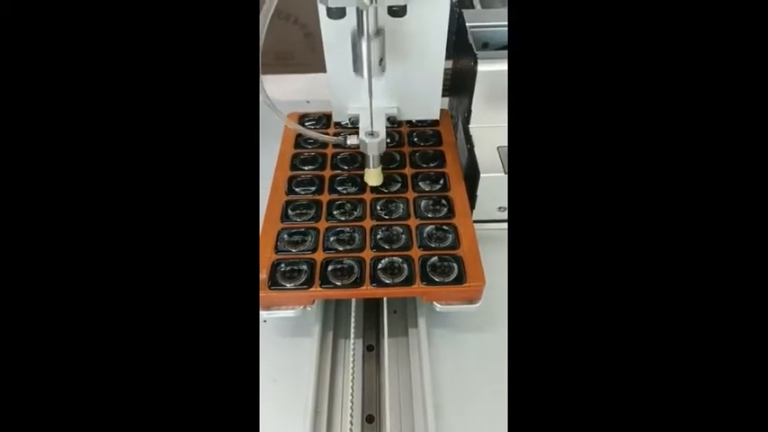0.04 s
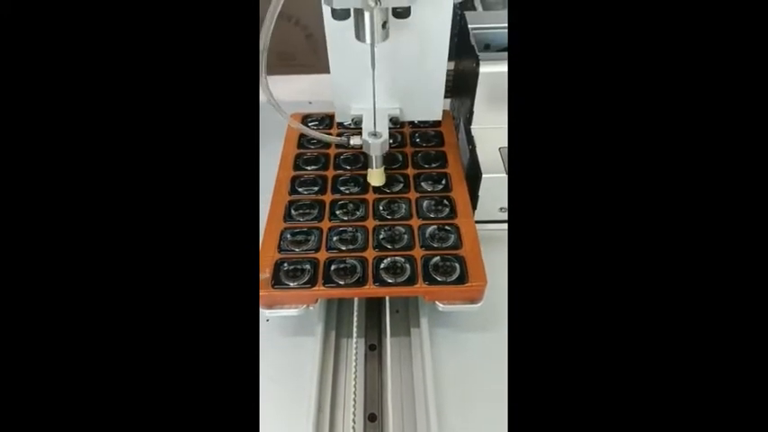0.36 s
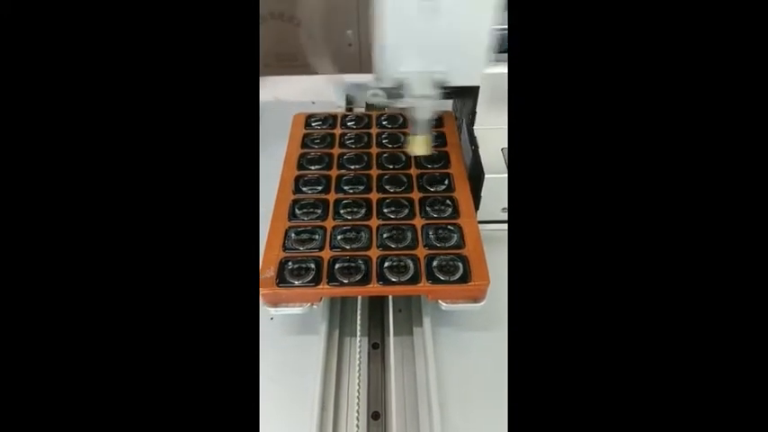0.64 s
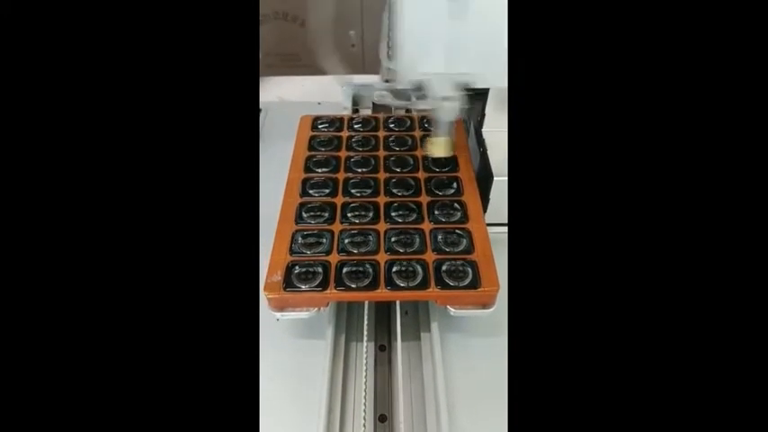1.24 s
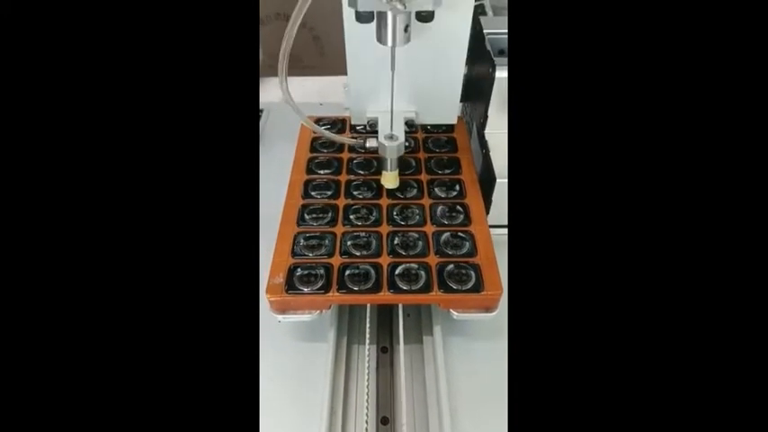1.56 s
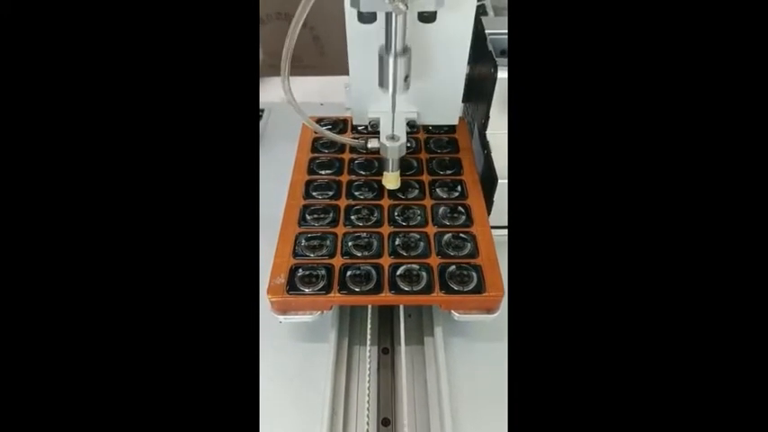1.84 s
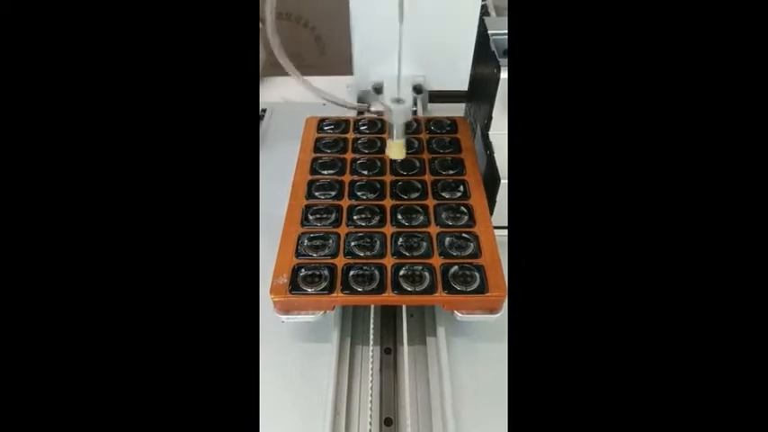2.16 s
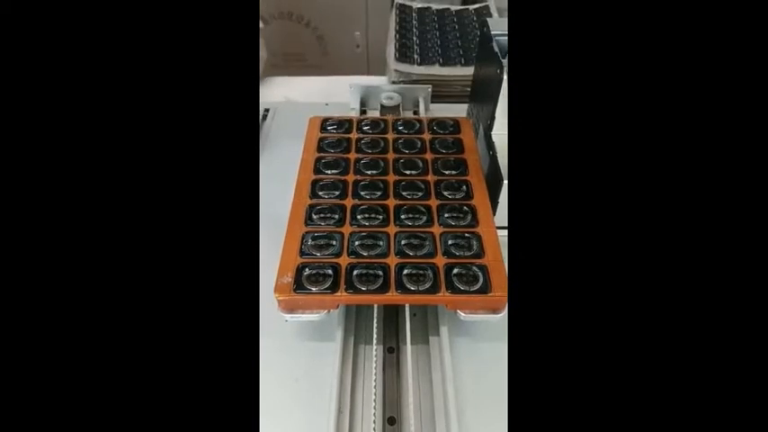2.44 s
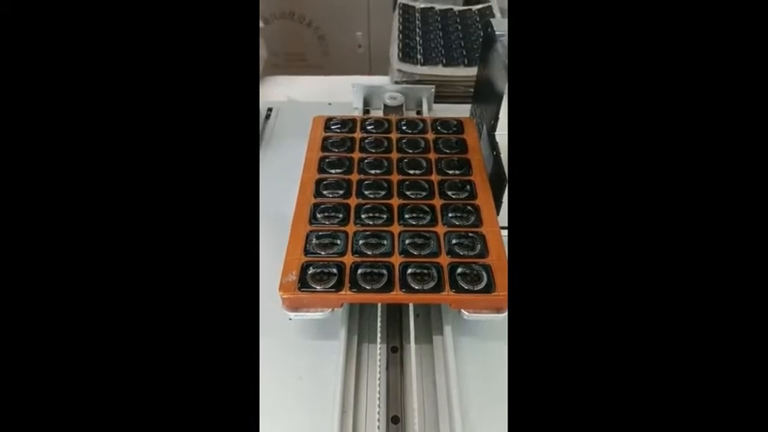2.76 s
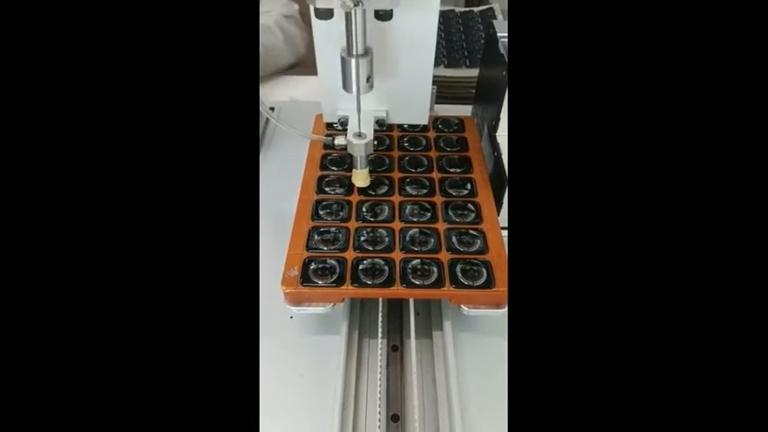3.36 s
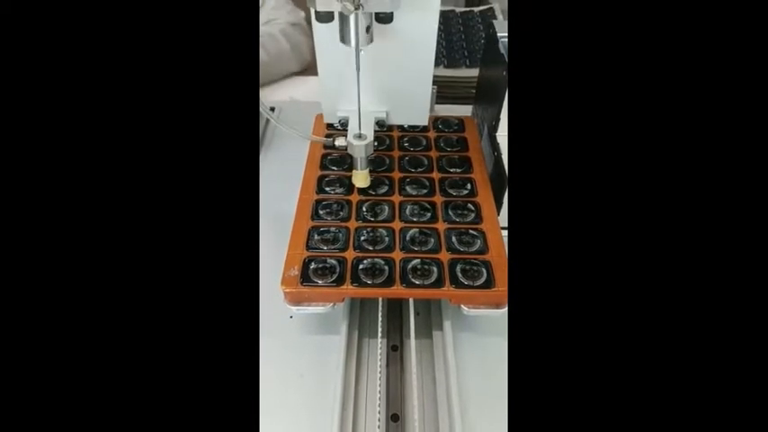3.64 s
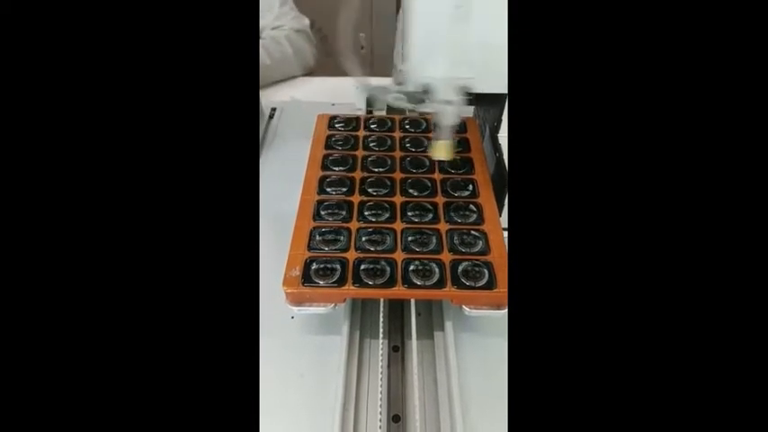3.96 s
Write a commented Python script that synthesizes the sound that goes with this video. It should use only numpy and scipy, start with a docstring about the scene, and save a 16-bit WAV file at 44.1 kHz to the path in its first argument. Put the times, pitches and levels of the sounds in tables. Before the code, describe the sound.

A pick-and-place machine runs close by over a fluttering pump hum and workshop fan noise. Its air cylinder hisses down and up, knocking at each end with a low rumble, at 0 to 0.3 seconds, 1.5 to 1.9 and 3.2 to 3.6. The head rushes and rattles along rails with motor growl and thin metallic ringing around 0.6, 1.3, 2.2 and 2.9 seconds, starting again near 3.8.

```python
"""A noisy workshop, with a pick-and-place machine working close by.
A vacuum pump hums and its air flutters. The head rolls and rattles along its rails, its motor
growls, and jolts set a metal part ringing. An air cylinder hisses as it drives the nozzle down
and up, and knocks at both ends; the level dips briefly after most knocks."""
import sys
import numpy as np
from scipy import signal
from scipy.fft import rfft, irfft
from scipy.io import wavfile

SR = 44100
rng = np.random.default_rng(int(sys.argv[2]) if len(sys.argv) > 2 else 0)


def persist_wave(psi):
    """Save psi, clipped to +-1, as 16-bit WAV."""
    counts = np.round(np.clip(psi, -1, 1) * 32767).astype(np.int16)
    wavfile.write(sys.argv[1], SR, np.atleast_2d(counts).T)


N = 176400
TIME = np.arange(N) / SR
CUTOFF_HZ, RUN_RAMP_S = 7520, 0.029
# knocks of cylinder and carriage
# (time [s], thud [dB], clack [dB], tick [dB], relative dip after it [dB]; a negative dip lifts)
KNOCK_CUES = [(.122,-16.5,-22,-24.5,-0.5),(0.1436,-12,-13,-21,2),(.317,-33,-12,-13.5,2),(.413,-18,-37,-16,6),(.551,-28,-21.5,-23.5,1),(0.924,-11,-24,-37.5,-0.5),(1.499,-38,-20.5,-26,8.5),(1.710,-19,-20,-26,3.5),(1.7311,-6,-10,-23.5,-5.5),(1.758,-22,-26,-29,7),(1.929,-27,-12.5,-20.5,3),(2.014,-16.5,-37,-29,6.5),(2.148,-17,-17,-25,4),(2.518,-11,-21,-29.5,0),(3.162,-18.5,-20,-30,7),(3.391,-9.5,-11,-20,2),(3.571,-24,-10.5,-17,-0.5),(3.66,-22,-30,-17.5,6),(3.797,-19,-23.5,-26,3.5)]


def from_db(db):
    """Decibels to gain."""
    return 10 ** (np.asarray(db) / 20)


def rms_one(x):
    """Scale to unit power."""
    return x / np.sqrt(np.mean(x ** 2) + 1e-20)


def pan(db):
    """Left side up by db, right side down by as much."""
    return from_db([[db], [-db]])


def at_hz(points, hz):
    """Read a curve on a log-frequency axis."""
    points_hz, values = np.transpose(points)
    return np.interp(np.log(hz + 1e-3), np.log(points_hz), values)


def drift(rate_hz):
    """Smooth random wander of unit power."""
    hz = np.fft.rfftfreq(N, 1 / SR)
    return rms_one(irfft(rfft(rng.standard_normal(N)) / (1 + (hz / rate_hz) ** 2), N))


def gate(start, end, ramp):
    """Open from start to end, with sloping edges."""
    return np.clip(np.minimum(TIME - start, end - TIME) / ramp + .5, 0, 1)


def noise(spectrum, peaks=()):
    """Coloured stereo noise with resonances and the width of the room; its mid has unit power."""
    # stereo width of the room (frequency [Hz], side minus mid [dB])
    room_width = [(60,-9),(120,-27),(220,-15.5),(400,-10.5),(600,-1.5),(1000,-4),(1300,0.5),(1750,-3.5),(2050,3),(2300,-7.5),(2650,-1.5),(4000,-1),(5200,-1)]
    hz = np.fft.rfftfreq(N, 1 / SR)
    peaks_db = sum(height / (1 + (2 * (hz - centre) / width) ** 2) for centre, width, height in peaks)
    passband = (hz < CUTOFF_HZ + 500) / np.sqrt(1 + (spectrum[0][0] / 2 / (hz + 1)) ** 4)
    colour = from_db(at_hz(spectrum, hz) + peaks_db) * passband
    mid, side = rfft(rng.standard_normal((2, N))) * colour / np.sqrt(np.mean(colour ** 2))
    return irfft(mid, N) + irfft(side * from_db(at_hz(room_width, hz)), N) * np.array([[1], [-1]])


def bursts(spans, spectrum):
    """Fluttering noise that lasts as long as each movement."""
    envelope = sum(gate(start, end, ramp=0.0034) * from_db(db) for start, end, db in spans)
    return noise(spectrum) * envelope * from_db(2.1 * drift(30) - 1.5)


def rough_tone(hz, rough, width_hz, phase=0):
    """A tone that wavers at random in level and phase."""
    shake = 1 + rough * (drift(width_hz) + 1j * drift(width_hz))
    return np.real(shake * np.exp(2j * np.pi * hz * TIME + 1j * phase))


def ring(clicks, hz, t60):
    """Each click starts a decaying sine."""
    radius, angle = from_db(-60 / (t60 * SR)), 2 * np.pi * hz / SR
    feedback = [1, -2 * radius * np.cos(angle), radius * radius]
    return signal.lfilter([0, np.sin(angle)], feedback, clicks + 1e-18)


def struck(modes, times, levels_db, contacts):
    """Each blow and its quick bounces strike every mode with a strength of its own."""
    bounce_s, loss_db, spread_db = .0042, 3, 3.5
    bounce = np.arange(contacts)
    delays = bounce_s * bounce * rng.uniform(0.695, 1.5, (len(times), contacts))
    at = ((times[:, None] + delays) * SR).astype(int)
    out = np.zeros((2, N))
    for k, (hz, db, t60) in enumerate(modes):
        for side in range(2):
            scatter_db = spread_db * rng.standard_normal(at.shape)
            clicks = np.zeros(N)
            clicks[at] = from_db(levels_db[:, None] + db - loss_db * bounce + scatter_db)
            out[side] += (-1) ** k * ring(clicks, hz, t60)
    return out


def from_the_left(x):
    """The treble reaches the right side a little late; the bass arrives at both together."""
    treble_lag_s, bass_edge_hz = .00051, 720
    hz = np.fft.rfftfreq(N, 1 / SR)
    lag = treble_lag_s / (1 + (bass_edge_hz / (hz + 1)) ** 12)
    return np.array([x[0], irfft(rfft(x[1]) * np.exp(-2j * np.pi * hz * lag), N)])


def panels(x, count):
    """Reflections off nearby panels comb the treble; their paths change slowly."""
    near_s, far_s, sway_s, gain, low_cut_hz = .003, .012, .00012, 0.21, 804
    treble = signal.sosfilt(signal.butter(2, low_cut_hz, "high", fs=SR, output="sos"), x)
    out = x.copy()
    for lag in rng.uniform(near_s, far_s, count):
        late = TIME - lag - sway_s * drift(1.4)
        out += gain * np.array([np.interp(late, TIME, side) for side in treble])
    return out


def shifting_resonances(x, size=1024):
    """Narrow resonances of the machine come and go, each for a fraction of a second."""
    # depth of the resonances (frequency [Hz], swing [dB])
    depth = [(300,1.5),(1000,4.5),(2500,3.1),(6000,1.5)]
    width_hz, life_s = 190, 0.085
    hz, times, bands = signal.stft(x, SR, nperseg=size, noverlap=size * 3 // 4)
    chance = np.fft.rfft2(rng.standard_normal(bands.shape[1:]))
    across, along = np.fft.fftfreq(len(hz), hz[1])[:, None], np.fft.rfftfreq(len(times), times[1])
    blur = np.exp(-(across * width_hz) ** 2 - (along * life_s) ** 2)
    patches = rms_one(np.fft.irfft2(chance * blur, bands.shape[1:]))
    gain = from_db(at_hz(depth, hz)[:, None] * np.minimum(patches, 1))
    gain /= np.sqrt(np.mean(gain ** 2, axis=1, keepdims=True))
    return signal.istft(bands * gain, SR, nperseg=size, noverlap=size * 3 // 4)[1][:, :N]


def workshop():
    """A flickering bed of fans and air from the surrounding machines."""
    # room tone (frequency [Hz], relative density [dB])
    room_tone = [(25,-31),(50,-19.5),(80,-8.5),(112,0.5),(170,-3),(240,-4.5),(310,-6),(460,-7),(590,-13),(780,-8),(980,-13),(1370,-12.5),(1950,-12.5),(2400,-14),(2750,-10.5),(3100,-11),(3600,-7.5),(4000,-10.5),(4300,-13.5),(4620,-8.5),(4850,-19.5),(5400,-16.5),(6000,-13),(6700,-10),(7100,-11.5),(7450,-15)]
    level_db, flicker_db = -24, 1.5
    return noise(room_tone) * from_db(level_db + flicker_db * drift(25)) * from_db([[-.5], [.6]])


def pump():
    """The vacuum pump hums on multiples of its stroke rate and puffs air at each stroke."""
    # swell of the strong third partial (time [s], level [dB])
    swell = [(0,-30.5),(.13,-22),(.3,-27),(.5,-27.5),(.69,-25.5),(.76,-44.5),(.96,-31),(1.19,-41.5),(1.27,-24.5),(1.72,-27.5),(1.99,-30.5),(2.1,-22),(2.28,-25.5),(2.38,-43),(2.8,-38.5),(2.86,-25),(3.15,-25.5),(3.33,-31),(3.86,-22.5),(3.95,-37)]
    # weaker partials (multiple of the stroke rate, level [dB])
    partials = [(4,-38),(6,-40),(7,-46),(9,-42.5),(13,-50.5),(22,-45)]
    # pulsed air (frequency [Hz], relative density [dB])
    puff = [(300,12.5),(1000,0),(2000,0),(2600,-14),(4000,-3),(5100,-2.5),(6500,-2),(7500,-3.5)]
    stroke_hz, wander, left_lag_s, waver_db = 50.9, 0.00512, 0.00026, 4
    phase = 2 * np.pi * np.cumsum(stroke_hz * (1 + wander * drift(5.62))) / SR
    hum_db = np.interp(TIME, *np.transpose(swell))
    third = np.sin(3 * (phase - 2 * np.pi * stroke_hz * left_lag_s * np.array([[1], [0]])))
    hum = from_db(hum_db + drift(11)) * third * pan(1.2)
    for k, db in partials:
        hum += from_db(db + waver_db * drift(6)) * np.sin(k * phase + rng.uniform(0, 2 * np.pi))
    strokes = rms_one(np.exp(np.cos(phase)))
    puff_db = -31.5 + 0.56 * (hum_db - hum_db.mean())  # the air swells with the hum
    return np.sqrt(2) * hum + noise(puff) * strokes * from_db(puff_db)


def frame_rumble():
    """The frame rumbles from the nozzle's landing until just after it has risen again."""
    # shudders (start [s], end [s], relative level [dB])
    shudders = [(.11,.42,-29.5),(1.72,2.03,-30),(3.36,3.67,-29)]
    # rumble (frequency [Hz], relative density [dB])
    rumble = [(40,-23),(75,-1),(110,8),(170,-12),(420,-7),(800,-35.5)]
    return bursts(shudders, rumble)


def travel_level():
    """Each run of the head swells or fades at its own rate."""
    # runs (start [s], end [s], relative level at midpoint [dB], growth over the run [dB])
    runs = [(0.346,0.409,-20.5,3),(0.576,0.934,-30.5,-11),(1.17,1.513,-25.5,5),(1.959,2.029,-22,5),(2.18,2.443,-25,-17.5),(2.833,3.163,-24,5),(3.823,4.05,-30.5,-25)]
    level = np.zeros(N)
    for start, end, db, growth in runs:
        from_midpoint = np.clip((TIME - start) / (end - start) - .5, -.5, .5)
        level += gate(start, end, RUN_RAMP_S) * from_db(db + growth * from_midpoint)
    return level


def rails():
    """Bearings and belt rush unevenly while the head travels."""
    # rolling noise (frequency [Hz], relative density [dB])
    rush = [(40,-16),(110,-6),(300,8),(600,6),(950,-2),(1400,1.5),(1900,-0.5),(2500,-1),(3550,2.5),(4250,-5.5),(4950,-6),(6500,-7.5),(7500,-12.5)]
    # resonances of rails and belt (frequency [Hz], width [Hz], height [dB])
    peaks = [(1158,18,8),(2086,56,5.5),(3560,190,-6),(4610,290,11.5)]
    return noise(rush, peaks) * travel_level() * from_db(0.7 * drift(72) - 2.5) * pan(-1.1)


def rattle():
    """Small contacts of uneven size ring chain links and covers, harder while the head travels."""
    # modes of cable chain and covers (frequency [Hz], relative level [dB])
    modes = [(910,1.5),(1130,0.5),(1330,-12),(1850,-5.5),(2040,0.5),(2480,-3.5),(2740,2),(3050,-2.5),(3500,0),(3830,-2.5),(4070,-1.5),(4580,1.5),(4720,-0.5),(6650,0)]
    hits_per_s, size_db, idle_db, travel_db = 55, 5, -30.5, -8.5
    out = np.zeros((2, N))
    for hz, db in modes:
        at = rng.integers(0, N, int(hits_per_s * N / SR))
        hit_db = size_db * np.minimum(rng.exponential(1, len(at)), 3)
        clicks = np.zeros((2, N))
        clicks[:, at] = from_db(hit_db + 2 * rng.standard_normal((2, len(at))))
        out += from_db(db) * rms_one(ring(clicks, hz, t60=0.046))
    level = np.hypot(from_db(idle_db), from_db(travel_db) * travel_level())
    return rms_one(out) * level * pan(-1.5)


def belt_scrape():
    """The belt scrapes as the head brakes."""
    # braking (start [s], end [s], relative level [dB])
    braking = [(1.40,1.50,-28.5),(3.06,3.165,-26)]
    # scrape (frequency [Hz], relative density [dB])
    scrape = [(2200,-17),(3200,-8),(3900,-6),(4650,8),(5100,-7),(7500,-6)]
    return bursts(braking, scrape)


def motor():
    """Under load the drive growls in a handful of rough, wavering resonances."""
    # hard pulls (start [s], end [s], level [dB])
    pulls = [(0.578,0.698,-31),(1.26,1.365,-33.5),(2.176,2.336,-32),(2.91,3.032,-28.5)]
    # resonances of the drive (frequency [Hz], relative level [dB])
    modes = [(355,-2.5),(462,4.5),(665,-1.5),(1128,3.5),(1437,-4),(1615,-0.5),(2082,-5)]
    growl = sum(from_db(db) * rough_tone(hz, rough=1, width_hz=9.2) for hz, db in modes)
    return rms_one(growl) * sum(gate(start, end, RUN_RAMP_S) * from_db(db) for start, end, db in pulls)


def metal_ring():
    """One lightly damped mode, shaken up at each jolt, in nearly opposite phase left and right."""
    # jolts (time [s], level [dB], build-up [s])
    jolts = [(.317,-26,.008),(.6,-25,0.038),(.735,-24,0.026),(1.15,-29,0.013),(1.25,-32.5,.02),(1.929,-26,0.007),(2.19,-21,0.052),(2.33,-23.5,0.024),(2.745,-25,0.016),(2.85,-21.5,0.038),(3.572,-31,.01),(3.87,-18,0.086)]
    t60_s = 0.83
    power = np.zeros(N)
    for start, db, rise in jolts:
        attack = np.clip((TIME - start) / rise, 0, 1)
        decay = from_db(db - 60 * np.maximum(TIME - start - rise, 0) / t60_s)
        power += (attack * decay) ** 2
    tone = rough_tone(hz=1650, rough=0.55, width_hz=35, phase=np.array([[2.58], [0]]))
    return np.sqrt(power) * rms_one(tone) * pan(-1)


def chinks():
    """A few light, bright hits, each with one bounce."""
    # hits (time [s], level [dB])
    hits = [(.706,-11.5),(1.3005,-16),(3.1144,-14)]
    # bright modes (frequency [Hz], gain [dB], t60 [s])
    modes = [(3270,-0.33,0.02),(3560,-1.9,0.0093)]
    return struck(modes, *np.transpose(hits), contacts=2)


def cylinder():
    """Air hisses as it drives the nozzle, with one colour going down and another going up."""
    # air strokes (start [s], end [s], relative level [dB])
    down_strokes = [(-.08,.155,-23),(1.5,1.745,-20.5),(3.165,3.39,-21.5)]
    up_strokes = [(.24,.322,-23),(1.82,1.93,-23),(3.48,3.575,-23.5)]
    # their hiss (frequency [Hz], relative density [dB])
    down_hiss = [(1500,-24.5),(2400,-18),(3000,-20),(4100,-2.5),(4600,-8.5),(5000,-14),(5550,-13.5),(5800,5.5),(6150,7),(6480,1.5),(6750,-3.5),(7050,3.5),(7450,-3.5)]
    up_hiss = [(1500,-2),(2500,-9),(3200,-3),(3800,0.5),(4600,4),(5000,-22),(5450,-2.5),(5850,7.5),(6300,-3),(6700,2.5),(7050,5.5),(7450,5)]
    return bursts(down_strokes, down_hiss) + bursts(up_strokes, up_hiss)


def knocks():
    """At each knock the frame thuds, the head clacks and loose parts tick."""
    # modes of frame and head (frequency [Hz], gain [dB], t60 [s])
    frame_modes = [(82,-16.5,0.079),(116,-13.5,0.079),(174,-4.5,0.071),(258,-6.5,0.048)]
    head_modes = [(335,-6,0.039),(432,-5,0.062),(550,-9,0.023),(693,-6,0.034),(803,-2,0.027),(916,-4,0.021),(1060,-6.5,0.019),(1750,-10.5,0.017)]
    tick_t60_s = 0.036
    times, thud_db, clack_db, tick_db, _ = np.transpose(KNOCK_CUES)
    thuds = struck(frame_modes, times, thud_db, contacts=1)
    clacks = struck(head_modes, times, clack_db, contacts=5)
    # tick of loose parts (frequency [Hz], relative density [dB])
    tick = [(600,-13),(1200,8),(2000,12.5),(2600,0.5),(3600,13),(4600,4.5),(5200,0),(7500,-4)]
    tick_level = sum((TIME >= start) * from_db(db - 60 * np.clip((TIME - start) / tick_t60_s, 0, 2))
                     for start, db in zip(times, tick_db))
    return (thuds + clacks + tick_level * noise(tick)) * pan(2)


def dips():
    """The level sinks briefly after most knocks and lifts after a few, more so on the right."""
    fall_s, hold_s, recover_s = 0.02, 0.028, 0.026
    depth_db = np.zeros(N)
    for start, *_, dip_db in KNOCK_CUES:
        fall = np.clip((TIME - start) / fall_s, 0, 1) ** 2
        release = np.exp(-np.maximum(TIME - start - fall_s - hold_s, 0) / recover_s)
        depth_db += dip_db * fall * release
    return from_db(-depth_db * np.array([[.85], [1.2]]))


def scene():
    """Room tone, travel and hiss take on the machine's colour; pump, motor and hits stay direct."""
    hiss = cylinder()
    travel = rails() + rattle() + belt_scrape() + frame_rumble()
    light_hits = chinks()
    air = shifting_resonances(panels(from_the_left(workshop() + travel) + hiss, count=5))
    return (air + pump() + motor() + knocks() + light_hits + metal_ring()) * dips()


def record(dry):
    """The loudest peaks are rounded and the top is cut steeply."""
    peak_limit = .6
    rounded = dry / (1 + (dry / peak_limit) ** 4) ** (1 / 4)
    return signal.sosfilt(signal.ellip(14, .1, 90, CUTOFF_HZ, fs=SR, output="sos"), rounded)


dry = scene()
out = record(dry)
persist_wave(out)
```